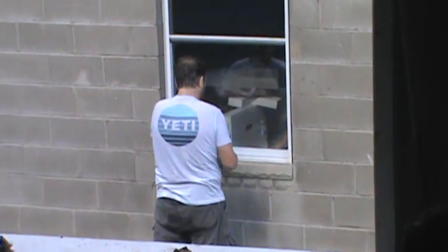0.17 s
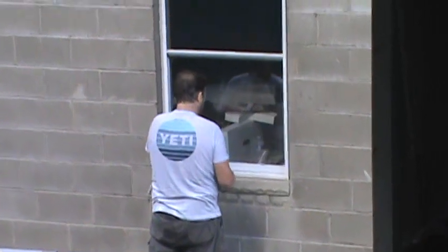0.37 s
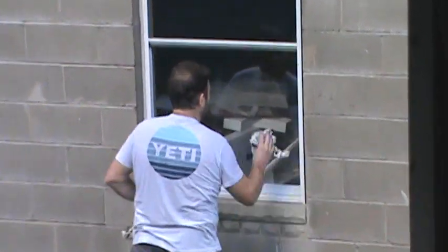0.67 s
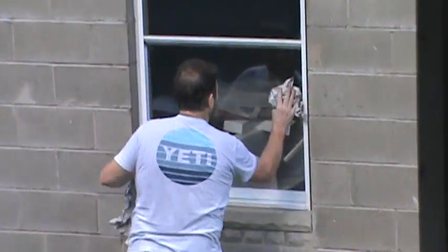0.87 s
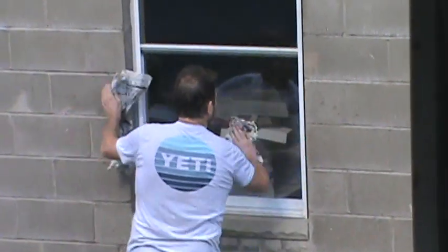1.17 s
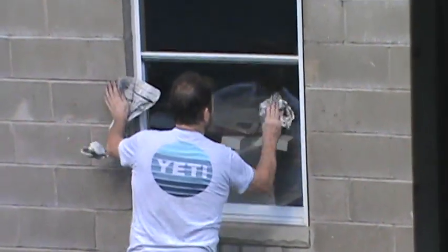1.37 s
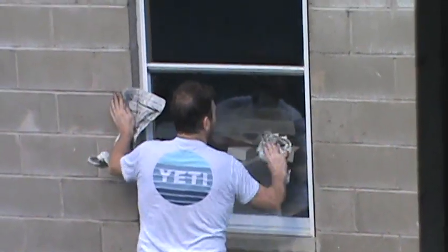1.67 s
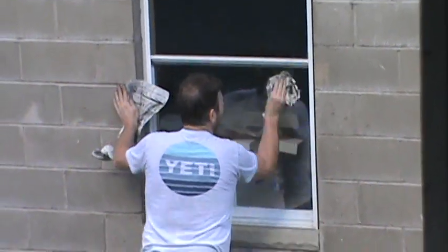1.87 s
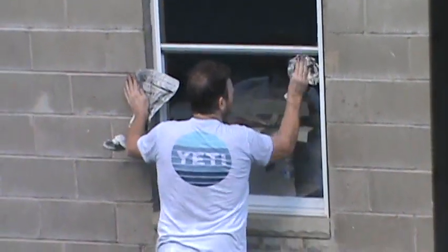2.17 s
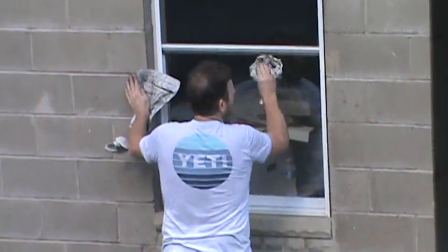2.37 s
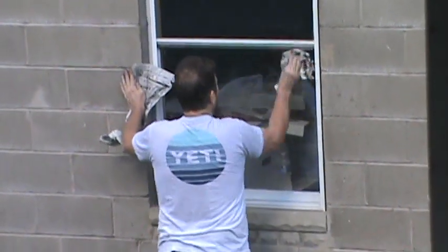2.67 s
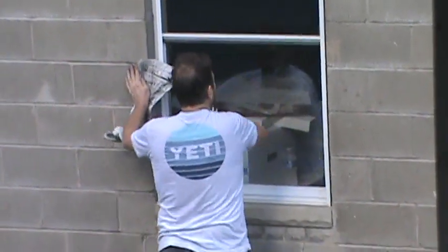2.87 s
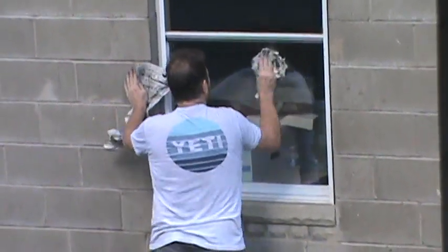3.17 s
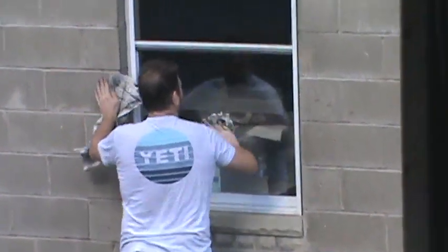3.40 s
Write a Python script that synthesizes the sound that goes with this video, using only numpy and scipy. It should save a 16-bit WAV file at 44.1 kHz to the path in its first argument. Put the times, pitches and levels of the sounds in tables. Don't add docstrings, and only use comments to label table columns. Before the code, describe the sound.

Crumpled newspaper rubs window glass in short, airy strokes, heard from some metres away outdoors. Camera handling ticks and a run of gear clicks come early; distant town hum and microphone hiss continue beneath.

```python
import sys
import numpy as np
from scipy import signal
from scipy.fft import rfft, irfft, next_fast_len
from scipy.io import wavfile
from scipy.ndimage import uniform_filter1d, map_coordinates

SR = 44100
rng = np.random.default_rng(int(sys.argv[2]) if len(sys.argv) > 2 else 0)


def linear_from_db(decibels):
    return 10 ** (np.asarray(decibels, float) / 20)


def generate_wav(sig):
    pcm = np.round(np.clip(np.atleast_2d(sig).T, -1, 1) * 32767).astype(np.int16)
    wavfile.write(sys.argv[1], SR, pcm)


N = 156114


def unit(x):
    return x / np.sqrt(np.mean(x ** 2) + 1e-20)


def along(points, hz):
    point_hz, value = np.transpose(points)
    return np.interp(np.log(hz + 1), np.log(point_hz + 1), value)


def bumps(peaks, hz):
    return 1 + sum((linear_from_db(db) - 1) / (1 + (2 * (hz - centre) / width) ** 2) for centre, width, db in peaks)


def filtered(x, response):
    m = next_fast_len(N + 8192)
    return irfft(rfft(x, m) * response(np.fft.rfftfreq(m, 1 / SR)), m)[..., :N]


def wobble(rate):
    knots = rng.standard_normal(int(N * rate / SR) + 4)
    return map_coordinates(knots, [np.arange(N) * rate / SR])


def patchy(depth_db, bins, frames):
    z = signal.stft(rng.standard_normal((2, N)), nperseg=512)[2]
    field = uniform_filter1d(rng.standard_normal(z.shape[1:]), bins, 0)
    field = uniform_filter1d(field, frames, 1)
    return signal.istft(z * linear_from_db(depth_db * unit(field)), nperseg=512)[1][:, :N]


# (pitch_hz, share)
DELAY_SHARE = [(200, 0.74), (1000, .8), (3000, .75), (5500, 0.24), (9000, .3)]


def stereo(pair, gain, sides):
    def responses(hz):
        share = np.clip(along(DELAY_SHARE, hz), 0, 1)
        side = gain(hz) * linear_from_db(along(sides, hz))
        return np.array([gain(hz), side * np.sqrt(1 - share), -1j * side * np.sqrt(share)])
    mid, own, late = filtered(pair[[0, 1, 0]], responses)
    return unit(np.array([mid + own + late, mid - own - late]))


def add(out, x, s):
    i = round(s * SR)
    out[..., i:i + x.shape[-1]] += x


# (pitch_hz, level_db per Hz)
TOWN = [(18, -48), (30, -19), (50, -8.5), (72, -5.5), (100, -15.5), (153, -8.5), (402, -6), (1470, -18),
        (1600, -19.5), (2080, -63), (3520, -120)]
# (pitch_hz, level_db per Hz)
HISS = [(590, -10.5), (1000, -18), (1590, -9.5), (1960, -2), (2330, -9), (3710, -9), (6400, -14),
        (10000, -10), (16000, -11)]
# (pitch_hz, width_hz, rise_db)
DRONES = [(76, 9.4, 4.5), (139, 14.4, 7), (247, 40, 8), (296, 10.5, 6.5), (394, 34, 3.5), (488, 32, 6.5),
          (611, 31, 8), (859, 107, 5.5), (1240, 22, 4.5), (1526, 21, 8), (1950, 62, -0.5)]
# (time_s, swell_db)
TRAFFIC = [(0, -3), (.3, -0.5), (.75, 0.5), (1.3, -0.5), (2.1, 0), (2.6, -1), (3.1, .5), (3.54, 3)]
# (pitch_hz, side_over_mid_db)
BACKGROUND_SIDES = [(60, -36), (150, -17), (380, -12), (950, -6.5), (2380, -5), (5980, -4), (15000, -14)]


def town_and_hiss():
    town_db, hiss_db = -52, -55.5

    def layer(pair, colour):
        return stereo(pair, lambda hz: linear_from_db(along(colour, hz)) * bumps(DRONES, hz), BACKGROUND_SIDES)
    town = layer(patchy(1.04, bins=3, frames=12), TOWN)
    hiss = layer(patchy(1.63, bins=10, frames=8), HISS)
    swell_db = np.interp(np.arange(N) / SR, *np.transpose(TRAFFIC))
    town_level = linear_from_db(town_db + swell_db + 0.23 * wobble(3.45))
    hiss_level = linear_from_db(hiss_db + 0.1 * wobble(4.48))
    return town_level * town + hiss_level * hiss


def electrical_tones():
    t = np.arange(N) / SR
    mains_hz, mains_db = 59.3, -64
    scan_hz, scan_db = 15735, -69.5
    mains = linear_from_db(mains_db + wobble(3.5)) * np.sin(2 * np.pi * mains_hz * t)
    scan = linear_from_db(scan_db + 0.7 * wobble(8)) * np.sin(2 * np.pi * scan_hz * t)
    return mains + scan


def zoom_motor():
    on_s, off_s, ramp_s = 0.368, 0.902, 0.004
    whine_hz, width_hz, level_db = 6640, 70, -64.5
    t = np.arange(N) / SR
    running = np.clip(np.minimum(t - on_s, off_s - t) / ramp_s, 0, 1)
    noise = rng.standard_normal((2, N))
    mid, side = unit(filtered(noise, lambda hz: np.exp(-((hz - whine_hz) / width_hz) ** 2 / 2)))
    return linear_from_db(level_db) * running * np.array([0.9 * mid + 1.2 * side, 1.1 * mid - 1.2 * side])


# (time_s, level_db)
PIPS = [(.99, -60), (1.059, -57), (1.192, -58), (1.257, -60), (1.326, -62), (1.459, -60), (1.593, -57),
        (1.728, -57), (1.794, -57), (1.862, -61), (1.962, -58), (2.026, -57), (2.094, -58), (2.16, -57),
        (2.261, -57), (2.433, -60), (2.59, -61), (3.187, -61)]


def drive_pips():
    pip_hz, pip_s, lead_s = 1916, 0.017, 0.005
    out = np.zeros(N)
    t = np.arange(round(pip_s * SR)) / SR
    swell = np.hanning(len(t))
    for s, db in PIPS:
        start = s - pip_s / 2
        add(out, linear_from_db(db + 1.0) * swell * np.sin(2 * np.pi * pip_hz * t), start + lead_s / 2)
        add(out, linear_from_db(db - 2.0) * swell * np.sin(4 * np.pi * pip_hz * t), start - lead_s / 2)
    return out


def through_body(make):
    side_db, side_hz, late_share = -5, 4500, 0.38
    mid = make()
    bright = np.gradient(make()) * SR / (2 * np.pi * side_hz) * linear_from_db(side_db)
    side = bright + late_share * signal.hilbert(mid).imag
    return np.array([mid + side, mid - side])


# (time_s, peak_db)
GEARS = [
    (0.451, -32),
    (0.5146, -28.5),
    (0.578, -30),
    (0.6416, -29.5),
    (0.7053, -30.5),
    (0.8014, -34.5),
]
# (pitch_hz, level_db, fall_by_60_db_s)
HOUSING_MODES = [(607, -18.5, 0.023), (830, -14, 0.02), (1026, -13.5, 0.015), (1270, -11.5, 0.011),
                 (2030, 0.5, 0.0091), (2730, -16.5, .007), (3220, -12.5, 0.0084), (3550, -13, 0.01),
                 (4450, -7.5, 0.0083), (4900, -23, 0.0066), (5280, -16.5, 0.0073), (5700, -13.5, 0.0047),
                 (8500, -25, 0.005)]


def gear_clicks():
    rise_cycles, rebound_s, rebound_db = 3.6, 0.0065, -13.5
    out, t = np.zeros((2, N)), np.arange(2600) / SR

    def ring():
        x = 0.14 * linear_from_db(-60 * t / 0.006) * rng.standard_normal(len(t))
        for hz, db, t60 in HOUSING_MODES:
            decay = linear_from_db(db + rng.normal(0, 0.95) - 60 * t / t60)
            rise = 1 - np.exp(-(t * hz / rise_cycles) ** 2)
            makeup = linear_from_db(60 * rise_cycles / hz / t60)
            x += decay * rise * makeup * np.sin(2 * np.pi * (hz * t + rng.random()))
        return x
    for s, db in GEARS:
        add(out, linear_from_db(db + 4) * through_body(ring), s)
        add(out, linear_from_db(db + 4 + rebound_db) * through_body(ring), s + rebound_s)
    return out


# (time_s, peak_db, pitch_hz)
TICKS = [(0.168, -42, 9500), (.2835, -32, 4550), (.2837, -34, 2920), (0.2828, -42.5, 8000),
         (.315, -56, 10500), (.368, -41.5, 3600), (.404, -53, 12500), (.433, -44, 11500),
         (.4615, -49, 11500), (.475, -49, 9000), (0.5108, -36, 7000), (0.5115, -45, 13000),
         (0.5129, -24, 4300), (0.5125, -29.5, 9500), (.9012, -37, 2030), (0.9032, -36.5, 4500),
         (0.9013, -36.5, 8750), (1.194, -45, 10000), (1.289, -42.5, 2800), (1.307, -46.5, 5500),
         (.886, -49, 8000), (1.352, -46, 5000), (1.367, -38, 11500), (1.369, -50, 3000),
         (1.402, -40.5, 4500), (1.41, -45, 6500), (1.411, -40, 12000), (1.453, -36.5, 2330),
         (1.4535, -45, 5300), (1.4517, -43, 11000), (1.458, -41, 9000), (1.493, -36.5, 11000),
         (1.4952, -44.5, 5100), (2.131, -44, 11900), (2.287, -48.5, 2850), (2.316, -40.5, 805),
         (2.319, -45, 1400), (2.319, -43.5, 2230), (2.838, -46, 3800), (2.8372, -41, 8500),
         (2.841, -43.5, 2190), (2.927, -51, 3000), (3.001, -43, 4200), (3.186, -44.5, 9500),
         (3.188, -46, 2020), (3.206, -46, 12000), (3.224, -49, 2830)]


def body_ticks():
    t60_s, relative_width = 0.01, 0.54
    out, t = np.zeros((2, N)), np.arange(2600) / SR
    f = np.fft.rfftfreq(len(t), 1 / SR)
    for s, db, hz in TICKS:
        damping = (f * relative_width * hz) ** 2
        resonance = damping / ((hz * hz - f * f) ** 2 + damping)

        def tick():
            x = irfft(rfft(rng.standard_normal(len(t))) * resonance, len(t))
            x = x * linear_from_db(-60 * t / t60_s)
            return x / np.abs(x).max()
        add(out, linear_from_db(db + 2) * through_body(tick), s)
    return out


# (start_s, length_s, first_pitch_hz, last_pitch_hz, level_db)
SQUEAKS = [(1.931, .018, 3200, 3000, -54), (1.948, .012, 3050, 3000, -60), (1.935, .013, 9300, 8900, -58),
           (1.922, .007, 12600, 13000, -60), (1.93, .007, 13500, 13700, -54),
           (1.943, .013, 14100, 14300, -61), (1.95, .021, 15700, 15600, -54),
           (1.971, .01, 15600, 15600, -53), (1.98, .017, 15750, 15400, -51),
           (1.996, .008, 15500, 15300, -54), (2.095, .008, 13600, 13000, -59),
           (2.252, .01, 13700, 13900, -58), (2.264, .012, 15400, 15700, -56),
           (2.672, .007, 13600, 14000, -58), (2.676, .006, 15000, 15500, -60),
           (1.118, .018, 2520, 2480, -60), (3.24, .014, 4200, 4500, -60), (3.26, .012, 4200, 4600, -63),
           (.402, .017, 5050, 5050, -63), (.418, .018, 9900, 9900, -64), (.364, .009, 3650, 3600, -57),
           (.383, .009, 3700, 3700, -58), (.29, .014, 2200, 2150, -59), (.312, .014, 2000, 2100, -60),
           (.336, .012, 2100, 2100, -61), (.356, .012, 2050, 2050, -61), (.386, .01, 2200, 2200, -60),
           (1.64, .014, 2150, 2100, -60), (2.976, .012, 2850, 2850, -60), (3.04, .03, 4300, 4450, -62),
           (3.05, .025, 2800, 2750, -62)]


def squeaks():
    out = np.zeros(N)
    for s, length, hz0, hz1, db in SQUEAKS:
        n = round(length * SR)
        rough = unit(uniform_filter1d(rng.standard_normal(4000), size=90))[:n]
        pitch = np.linspace(hz0, hz1, n) * (1 + 0.008 * rough)
        phase = 2 * np.pi * np.cumsum(pitch) / SR
        level = linear_from_db(db + 4.5 + 1.4 * rough[::-1]) * np.hanning(n) ** 0.41
        add(out, level * np.sin(phase), s)
    return out


# (start_s, length_s, hiss_level_db, pane_scrape_over_hiss_db)
STROKES = [(0.098, 0.13, -57.5, -7), (0.213, 0.12, -63, 0.5), (0.906, 0.13, -59, -0.5),
           (1.081, 0.074, -57, 1.5), (1.196, 0.083, -57.5, -3), (1.308, 0.19, -58.5, 0),
           (1.49, 0.103, -63, -1.5), (1.91, 0.13, -59, -7), (2.107, 0.12, -52, -10),
           (2.317, 0.11, -50.5, -9), (2.528, .12, -52, -9), (2.723, 0.07, -55.5, -26),
           (2.827, 0.11, -62, -23), (2.936, .17, -50, -5), (3.193, 0.07, -68, -14),
           (3.305, 0.068, -57.5, -3.5), (3.355, 0.099, -52, -3), (3.447, 0.075, -60.5, -1)]
# (pitch_hz, level_db)
PAPER = [(5500, -42), (7000, -11.5), (8500, 1), (11000, 3), (13500, 1.5), (16000, -7)]
# (pitch_hz, level_db)
PANE = [(600, -33), (1500, 1.5), (2500, -0.5), (4200, -3.5), (5500, -6.5), (7000, -14), (9000, -48)]
# (pitch_hz, width_hz, rise_db)
PANE_MODES = [(2120, 900, 2), (2800, 110, 4), (4300, 190, 0.5), (5300, 230, 6.5), (6850, 400, 10.5)]
# (pitch_hz, side_over_mid_db)
PAPER_SIDES = [(60, -27), (150, -16), (380, -11), (950, -20), (2380, -13), (5980, -7), (15000, -23)]


def fibres(colour, peaks):
    per_s, spread_db, top_db, smooth = 3800, 3.5, 13, 0.55
    strength = linear_from_db(np.minimum(spread_db * rng.exponential(size=N), top_db))
    catch = (rng.random(N) < per_s / SR) * strength
    pair = patchy(1.9, bins=8, frames=4) * (smooth + unit(catch) * (1 - smooth))
    noise = stereo(pair, lambda hz: linear_from_db(along(colour, hz)) * bumps(peaks, hz), PAPER_SIDES)
    return noise * linear_from_db(0.85 * wobble(60))


def rubbing():
    edge, arch_db = 0.16, 3
    t, hiss, scrape = np.arange(N) / SR, np.zeros(N), np.zeros(N)
    for s, length, db, pane_db in STROKES:
        u = (t - s) / length
        ends = np.sin(np.pi / 2 * np.clip(np.minimum(u, 1 - u) / edge, 0, 1))
        shape = ends * linear_from_db(db - arch_db * (2 * u.clip(0, 1) - 1) ** 2)
        hiss += shape
        scrape += shape * linear_from_db(pane_db)
    return hiss * fibres(PAPER, []) + scrape * fibres(PANE, PANE_MODES)


def scene():
    background = town_and_hiss() + electrical_tones()
    camera = zoom_motor() + drive_pips() + gear_clicks() + body_ticks()
    paper_on_glass = squeaks() + rubbing()
    left_db = 0.15
    return (background + camera + paper_on_glass) * linear_from_db(np.array([[left_db], [-left_db]]))


def band_limit(x):
    return signal.sosfilt(signal.butter(12, 16930, fs=SR, output="sos"), x)


def record(dry):
    start_s, fade_s, top_hz = 0.071, 0.018, 15950
    fade = np.clip((np.arange(N) / SR - start_s) / fade_s, 0, 1)
    mix = filtered(dry, lambda hz: hz < top_hz) * fade
    return band_limit(mix)


dry = scene()
out = record(dry)
generate_wav(out)
```